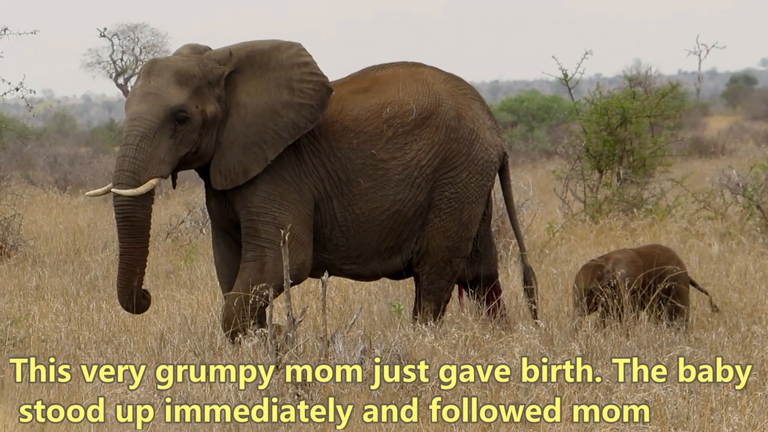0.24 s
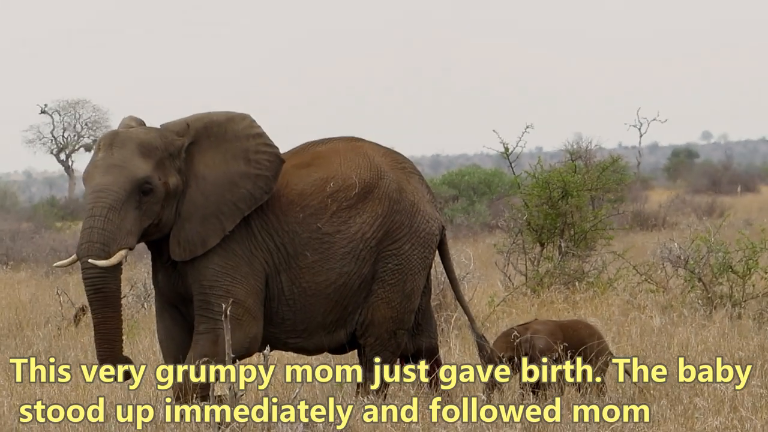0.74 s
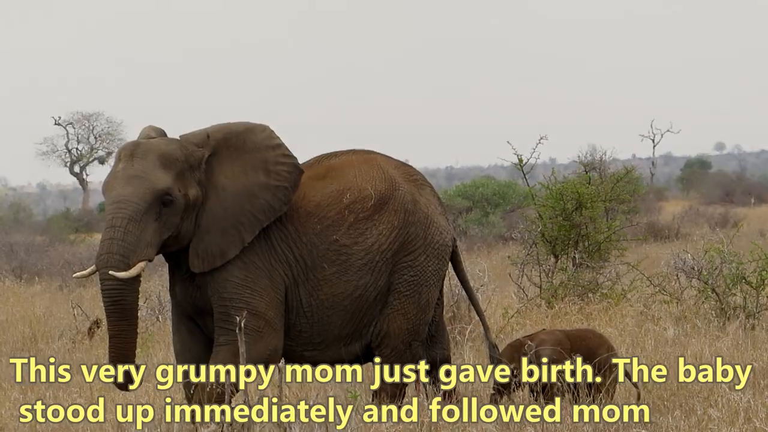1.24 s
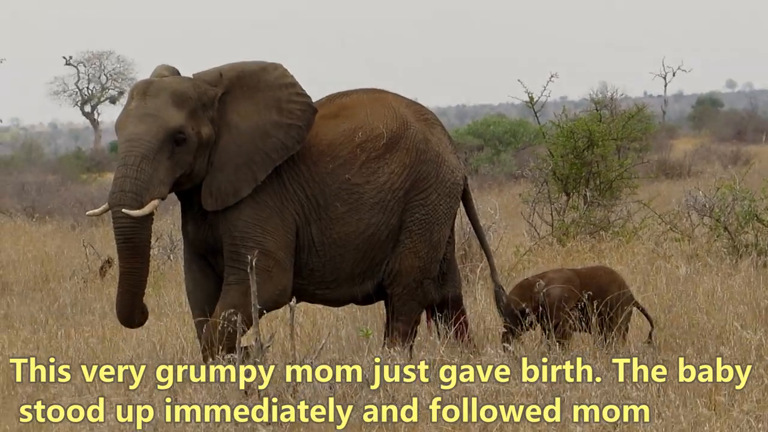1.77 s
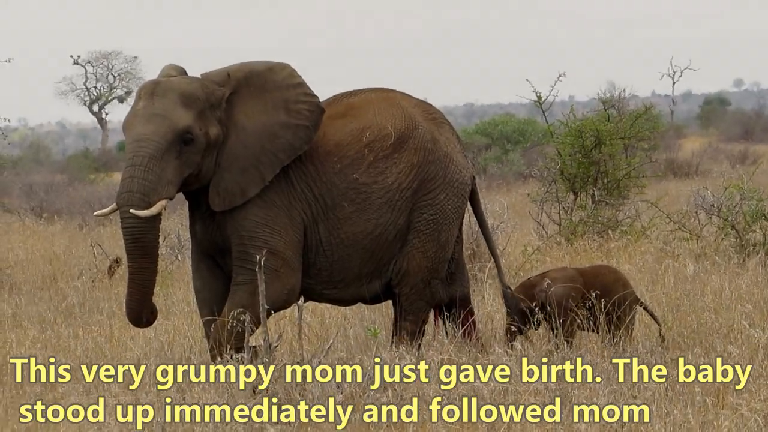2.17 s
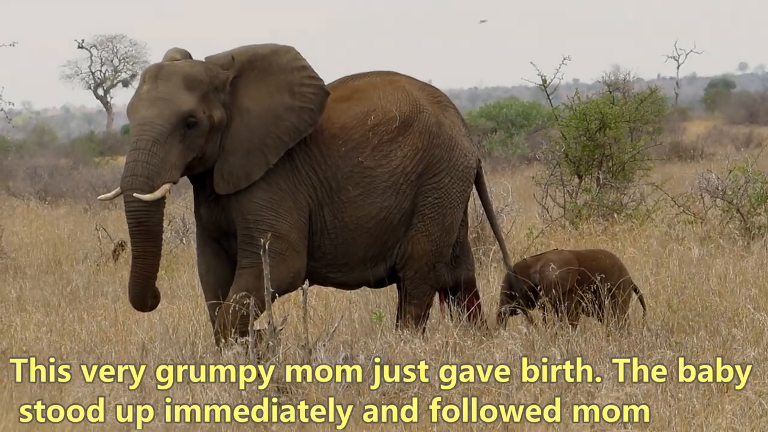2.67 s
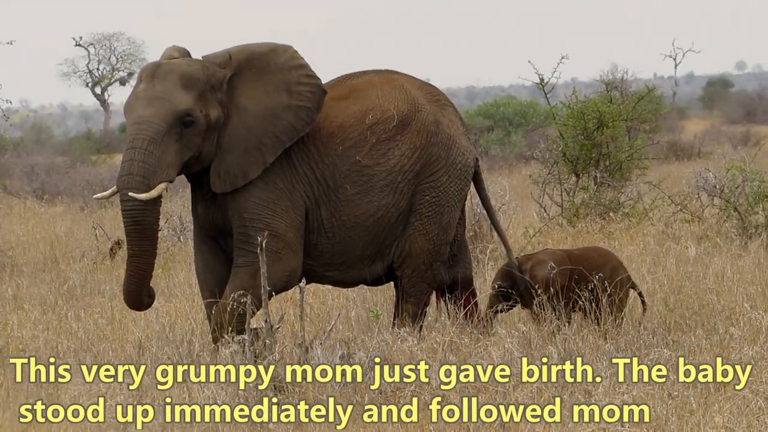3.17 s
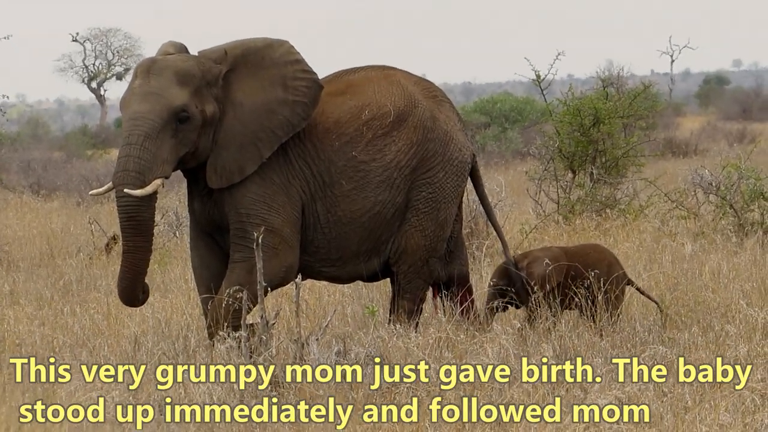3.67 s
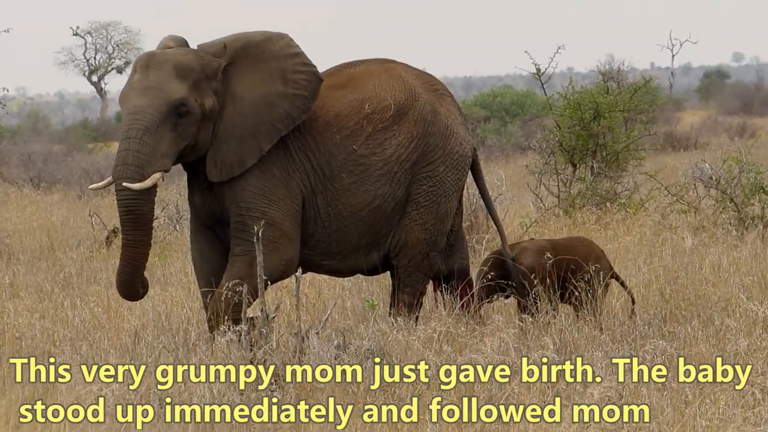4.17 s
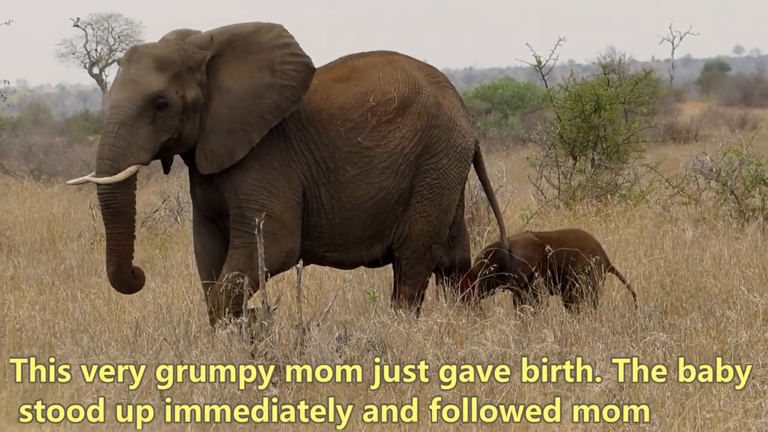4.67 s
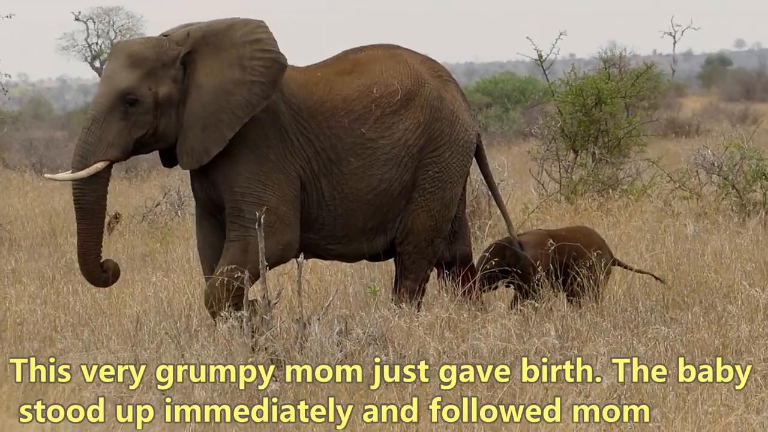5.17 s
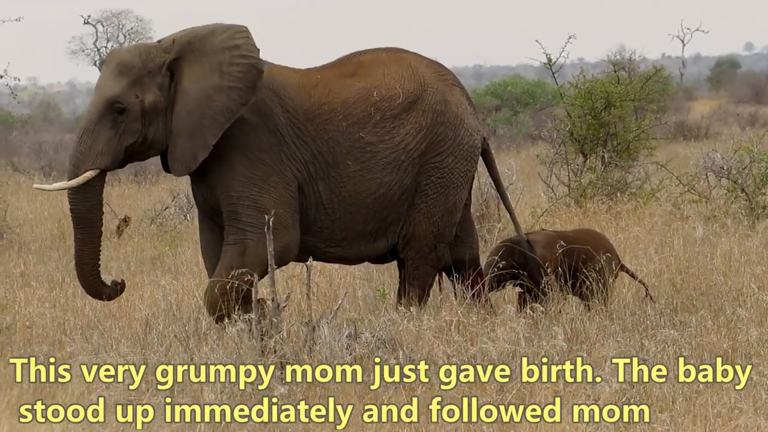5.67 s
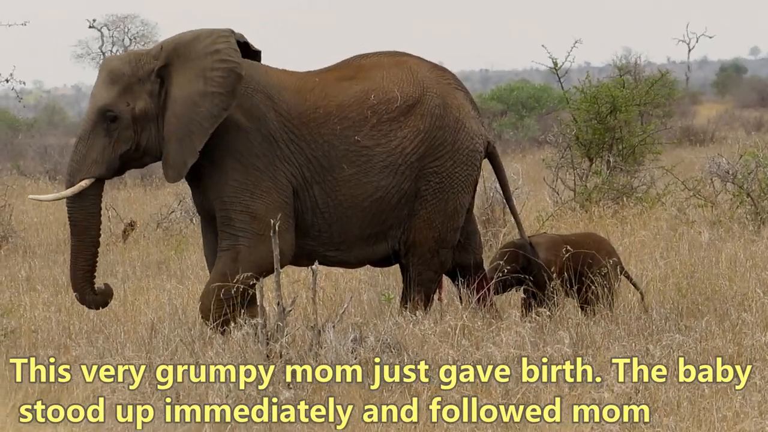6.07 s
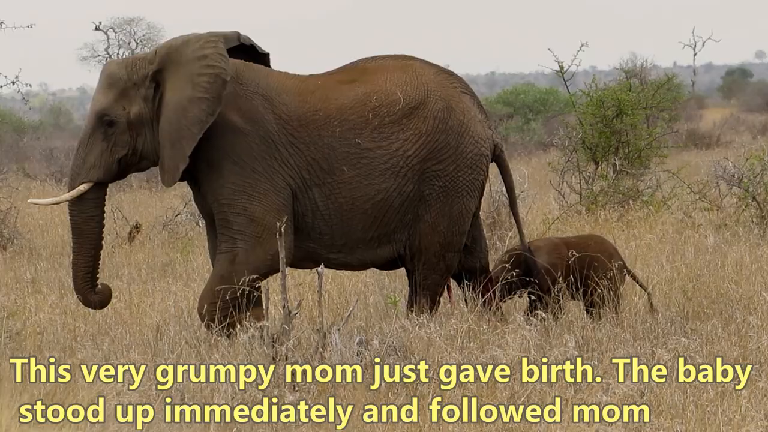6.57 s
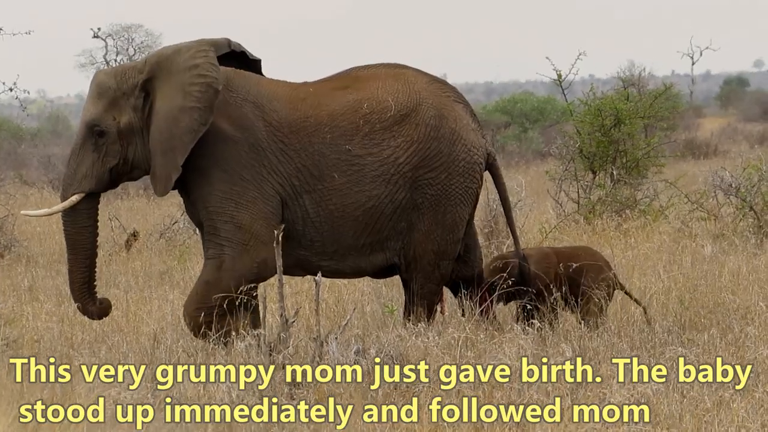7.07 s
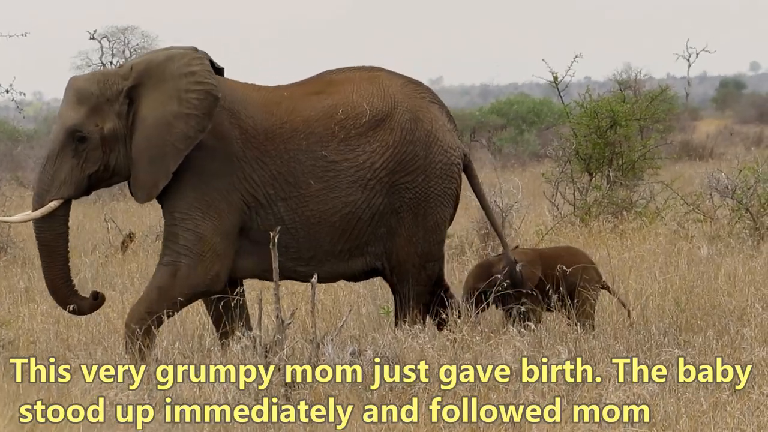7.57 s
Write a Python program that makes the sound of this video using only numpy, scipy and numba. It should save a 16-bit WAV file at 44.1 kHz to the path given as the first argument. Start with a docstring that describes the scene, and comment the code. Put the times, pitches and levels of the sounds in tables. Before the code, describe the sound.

Outdoors in dry grassland, stereo microphone with soft background hiss and faint insects. A large elephant bellows hoarsely from the first instant, crackles apart, and jumps abruptly to a quiet throaty rumble of separate slow pulses. The rumble swells and rises into a fuller, longer roar, rough and strained, collapsing into guttural growls. A hard cut to silence follows, then the quiet background returns with small clicks and light handling-like knocks.

```python
"""An elephant's roar is heard first, already under way; the sound cuts abruptly to a slow rumble,
which climbs into a second, longer roar, and then all sound drops out briefly. Pulses of the
larynx give way to chaotic flow with effort, and both excite resonances of chest, throat and mouth.
Around the voice: shaped-noise hiss, a drone and an insect band of resonant noise, and short
noise bursts for ticks and knocks near the microphone."""
import sys
import numpy as np
from scipy import signal
from scipy.fft import rfft, irfft
from scipy.io import wavfile
from scipy.ndimage import uniform_filter1d
from numba import njit

SR = 44100
rng = np.random.default_rng(int(sys.argv[2]) if len(sys.argv) > 2 else 0)


def dump_mix(stems):
    """Bounce the given channels to the path in sys.argv[1] as a 16-bit WAV at rate SR."""
    frames = np.atleast_2d(stems).T  # one column per channel
    limited = np.clip(frames, -1, 1)  # hard clip at full scale
    pcm = np.round(limited * 32767).astype(np.int16)
    wavfile.write(sys.argv[1], SR, pcm)


N = 345744

# hiss common to both sides, spectral shape: f/Hz, relative level/dB
COMMON_HISS = [(15, -36), (25, -0.5), (59, 0), (240, -4.5), (274, -2), (482, -8), (523, -4.5), (782, -4.5),
               (945, -2.5), (1020, -9), (2850, -14), (3930, -18), (9300, -18.5), (12800, -24), (15500, -35)]
# hiss opposite in the two sides, spectral shape: f/Hz, relative level/dB
OPPOSED_HISS = [(15, -35), (25, -14), (129, -0.5), (322, -4.5), (666, -9.5), (782, -9.5), (970, -11),
                (1660, -20.5), (3440, -25), (3930, -28.5), (7300, -30), (9500, -38.5), (13500, -56.5),
                (15500, -51)]
COMMON_HISS_DB, OPPOSED_HISS_DB = -37, -29
# gain of the whole background: t/s, level/dB
BACKGROUND_SWELL = [(0, -3.5), (.5, -1), (1.87, 2), (7.84, 1.36)]
# drone bands, before the swell: f/Hz, width of each resonance pass/Hz, level/dB
DRONE_BANDS = [(284.4, 50, -79.5), (537.2, 16, -48), (745, 58, -62), (886.6, 27, -50.5), (974, 168, -45.5)]
# insect band, before the swells: f/Hz, width of each resonance pass/Hz, level/dB
INSECT_BAND = (9370, 570, -54)
# the insects swell and ease: t/s, level/dB
INSECT_GAIN = [(0, -2), (1.8, 0), (2.3, 3.5), (2.9, 1), (3.4, 0.5), (7.84, 0)]
# short hissy ticks: t/s, relative level/dB (played 9.5 dB lower), f/Hz, level of the lower part against the
# relative level/dB (played 2 dB lower)
NEAR_TICKS = [(1.5384, -24.5, 13600, -12), (1.5663, -28, 13100, -8), (1.6796, -27, 13600, -9),
              (1.898, -31, 10600, -15), (2.0133, -29, 11580, -18), (2.1084, -28, 12700, -14),
              (2.215, -29, 12200, -17), (2.3161, -29, 12900, -15), (2.3979, -39, 11800, -13),
              (2.4943, -31, 10400, -12), (2.5661, -35, 12100, -13), (2.612, -30, 11300, -13),
              (2.6692, -31, 9810, -13), (2.7694, -36, 11000, -13), (2.8715, -33, 10400, -13),
              (2.9894, -37, 12200, -13), (3.0874, -43, 10900, -13), (3.1967, -35, 11300, -13),
              (3.2915, -37, 12100, -13), (5.2116, -31, 12400, -16), (5.2475, -32, 11210, -13),
              (5.288, -25.5, 10620, -11), (5.7862, -32, 11800, -14), (5.878, -33.5, 11710, -13),
              (6.7376, -31, 13300, -16), (6.8399, -30, 11700, -13), (6.9341, -29, 12400, -20),
              (7.0434, -32, 12300, -13), (7.1584, -33, 12100, -15), (7.8184, -28, 13100, -15)]
# small chance ticks, before a random offset: t/s, relative level/dB
CHANCE_TICKS = [(0, -52), (1.4, -50), (1.9, -45), (3.3, -45.5), (4, -52), (5.8, -46), (7.84, -49)]
# knocks with a ring: t/s, relative ring level/dB, f/Hz, 60 dB decay time/s, crack level/dB
NEAR_KNOCKS = [(2.385, -37, 2950, .04, -55), (5.654, -18.5, 2890, 0.045, -27),
               (6.274, -26.5, 3300, 0.045, -34), (6.7, -33.5, 2800, 0.039, -50),
               (6.806, -35, 2870, 0.03, -50), (6.86, -38, 1900, .04, -40), (6.932, -25, 333, 0.083, -36)]

# larynx pulse rate in the rumble: t/s, f/Hz
PULSE_RATE = [(2.35, 23.8), (2.642, 23.67), (2.726, 24.1), (2.906, 24.25), (3.058, 24.73), (3.166, 24.4),
              (3.288, 25.23), (3.406, 25.52), (3.57, 29.01), (3.72, 29.97)]
# voicing: t/s, chaotic share (0-1), share locked to the first resonance (0-1)
VOICING_SHARES = [(0, .8, .45), (1.2, .85, .5), (1.45, .7, .3), (1.7, .2, .65), (1.87, .1, .8),
                  (1.9, .05, 0), (2.4, .006, 0), (3.15, .008, 0), (3.5, .05, 0), (3.62, .18, 0),
                  (3.72, .3, .15), (3.8, .45, .5), (3.85, .5, .9), (3.93, .5, .9), (3.97, .6, .3),
                  (4.12, .6, .3), (4.17, .9, .9), (4.85, .9, .85), (4.95, .9, .5), (5.6, .85, .4),
                  (6.15, .8, .35), (6.22, .3, .6)]
# effort in five stages (first roar, its break-up, rumble, second roar, its break-up), each listing
# t/s, then relative level/dB of first resonance, open mouth, treble, chest, low rasp
CALL_STAGES = [
    [(0.0, -23.5, -26, -33, -52, -44.5), (0.03, -28, -32, -34.5, -61, -66),
     (0.09, -23, -28.5, -33, -60, -58), (0.27, -23.5, -28, -38, -62, -59),
     (0.362, -18.5, -26, -35.5, -51, -56), (0.434, -23, -25.5, -32.5, -67, -54),
     (0.542, -17.5, -22.5, -33, -38, -47), (0.668, -21, -26, -30.5, -64.5, -56),
     (0.772, -18, -21, -31, -38.5, -37.5), (1.232, -17.5, -20.5, -30.5, -40.5, -28),
     (1.25, -14, -17.5, -30, -41, -41)],
    [(1.28, -18, -21.5, -36, -41, -30.5), (1.328, -19.5, -21.5, -31, -40.5, -38),
     (1.426, -23, -19.5, -38, -35, -25), (1.454, -24.5, -32.5, -56, -30, -29),
     (1.546, -21, -28, -43, -38.5, -35), (1.606, -33, -38, -55, -34.5, -34),
     (1.644, -25, -42, -54, -39, -41), (1.704, -30, -47, -55, -31, -41), (1.738, -26, -48, -48, -39, -35),
     (1.812, -25, -56, -50, -28, -40), (1.874, -22.5, -41, -36, -28.5, -33)],
    [(1.89, -48, -51.5, -45, -44, -38), (1.936, -51, -58, -55, -48, -60), (2.19, -39, -56, -52, -38, -42),
     (2.28, -42, -49, -54, -43, -46), (2.328, -47, -56, -49, -39.5, -43),
     (2.504, -29, -40.5, -50, -31.5, -31.5), (2.69, -23.5, -47.5, -46, -32, -27),
     (2.742, -23, -35.5, -45, -30, -22), (2.936, -24.5, -39, -37, -32, -28),
     (3.066, -21.5, -40, -51, -30, -29.5), (3.18, -24.5, -36, -52, -28.5, -30),
     (3.26, -21, -37, -51, -31, -31), (3.44, -20.5, -36, -47, -31, -34),
     (3.6, -22.5, -40.5, -42, -27.5, -35)],
    [(3.63, -24.5, -43, -51, -31, -40.5), (3.74, -21, -37, -48, -31.5, -39),
     (3.79, -17.5, -26, -49, -33.5, -27), (3.858, -13, -26, -39, -42.5, -21.5),
     (4.048, -18, -26.5, -29.5, -46.5, -54), (4.086, -13, -23.5, -36, -51, -48),
     (4.242, -9.5, -27, -32.5, -42.5, -55), (4.33, -13.5, -23.5, -31.5, -46, -52),
     (4.454, -15, -26.5, -31.5, -48.5, -49), (4.53, -7.5, -25, -29.5, -47, -52),
     (4.6, -9, -25.5, -30.5, -45.5, -54), (4.66, -13, -21.5, -29.5, -46, -56.5),
     (4.77, -11, -22.5, -29, -43.5, -58), (4.85, -10, -22.5, -28.5, -42, -62),
     (4.89, -15, -20.5, -27, -42, -54), (5.02, -11, -24.5, -24.5, -44.5, -49),
     (5.308, -15, -23, -25.5, -43.5, -50), (5.546, -13, -21.5, -22.5, -44.5, -41),
     (5.58, -16.5, -19.5, -26, -47, -54)],
    [(5.61, -13, -20, -22.5, -44, -41.5), (5.634, -14, -17, -25.5, -40.5, -25),
     (5.668, -11, -22.5, -27.5, -33, -33.5), (5.742, -13.5, -18, -35, -36, -26),
     (6.012, -16.5, -26, -52, -34, -28), (6.062, -19, -26.5, -45, -39, -33),
     (6.158, -22.5, -29.5, -51, -28, -26), (6.196, -28.5, -40.5, -51, -34, -35),
     (6.266, -21.5, -42.5, -54, -30.5, -34.5), (6.274, -17, -37.5, -43, -31, -36.5),
     (6.34, -28.5, -43.5, -48.5, -27.5, -32.5)],
]
# brief changes of voice level, mostly dips: t/s, length/s, change/dB
VOICE_CATCHES = [(.245, .04, -3), (.7, 0.041, -3.5), (0.837, .05, -4), (.99, 0.026, -3.5),
                 (1.291, 0.025, -5), (1.385, 0.032, -7.5), (1.445, 0.028, -7), (1.519, 0.022, -9),
                 (1.705, .04, -5.5), (3.942, 0.04, -3), (4.02, 0.026, -4.5), (4.056, .03, -4.5),
                 (4.09, .02, -6.5), (4.361, .08, -2), (4.475, 0.035, 0), (4.519, 0.017, 0.5),
                 (4.647, 0.045, -3.5), (4.75, .03, -4.5), (4.91, .06, -3.5), (5.44, 0.028, -2),
                 (5.818, .02, -3.5), (6.004, 0.03, -6.5), (6.102, 0.029, -9), (6.139, 0.03, -9)]
# first throat resonance, climbing as the mouth opens: t/s, f/Hz
FIRST_RESONANCE = [(0, 261.2), (.1, 282), (.5, 265.8), (1.04, 293.7), (1.36, 286.5), (1.6, 256.2),
                   (1.74, 215.8), (1.87, 188), (2.2, 174), (2.62, 140.3), (2.85, 151), (3.0, 171),
                   (3.18, 177), (3.32, 193.5), (3.46, 199.6), (3.62, 215.4), (3.76, 262.4), (3.84, 272),
                   (3.9, 296), (3.94, 334.6), (3.96, 275), (4.1, 295.5), (4.14, 272), (4.2, 289.1),
                   (4.34, 284.8), (4.38, 305), (4.42, 281.7), (4.5, 299.2), (4.6, 315), (4.63, 283),
                   (4.84, 304), (4.9, 280), (5.02, 298.3), (5.1, 305), (5.2, 299.3), (5.3, 305),
                   (5.38, 317.6), (5.52, 301.9), (5.58, 271.6), (5.86, 264.7), (6.0, 245), (6.15, 255.1),
                   (6.27, 196.2)]
# higher resonances: width of each pass/Hz, share that follows the treble (0-1), then for each pose
# (first roar x3, rumble, second roar x3) a pair f/Hz, level against the open mouth/dB
UPPER_RESONANCES = [(110.7, 0.059, (520, -.5), (520, -2.5), (545, -2), (418, -1), (540, 0), (520, 1),
                    (475, 1.71)), (120.5, 0.0371, (700, -6.5), (750, -1.2), (840, 0.36), (320, -2.9),
                    (620, -6.5), (630, -10), (645, -4.5)), (129.2, 0.47, (880, -10.5), (920, -4),
                    (960, -9.5), (910, -12), (910, -2.5), (835, -10.5), (900, -9.5)), (90, 1, (1110, -6.5),
                    (1100, -1.3), (1170, -15), (1150, -9.5), (1195, -3), (1215, -3), (1200, -2.5)),
                    (100.5, 0.93, (1400, -15), (1400, -9.5), (1470, -4.5), (1370, -23), (1470, -3.5),
                    (1425, -2.7), (1435, -8.5)), (120.9, 0.99, (1560, -2), (1620, -8.5), (1690, -1.8),
                    (1600, -27), (1605, -9.5), (1620, -9), (1670, -10.5)), (99.2, 0.91, (1700, -9),
                    (1800, -11.5), (1910, -9), (1850, -21), (1700, -15), (1880, -12.5), (1865, -17)),
                    (130, 0.81, (2400, -17), (2350, -13.5), (2310, -10.5), (1800, -31), (2100, -31),
                    (2250, -33), (2300, -31)), (212.5, 0.61, (2700, -12), (2640, -10.5), (2620, -18.5),
                    (2590, -31), (2600, -16.5), (2700, -22), (2840, -18)), (390, 0.92, (3120, -19),
                    (3050, -20.5), (2950, -26.5), (3500, -25), (3230, -15.5), (3300, -21), (3000, -27))]
# times of the mouth poses; the rumble pose is held over two of them: t/s
POSE_TIMES = (0.1, .7, 1.2, 2.5, 3.5, 4.2, 4.9, 5.6)
# period doubling, every second swing weaker: t/s, length/s, level against first resonance/dB
PERIOD_DOUBLING = [(3.893, .14, -7), (5.72, .1, -14.5)]
# single strong growl pulses at the rough starts, middles and ends of the roars: t/s, relative level/dB
GROWL_PULSES = [(0.079, -9), (0.103, -11), (0.153, -11.5), (0.181, -10), (0.22, -12), (0.37, -12),
                (1.29, -15), (1.34, -13), (1.39, -12), (1.409, -16), (1.519, -7.5), (1.549, -10),
                (1.647, -9), (1.718, -17), (1.786, -17), (1.828, -20), (1.862, -20), (3.716, -13.5),
                (3.849, -5), (3.974, -2.5), (4.024, -6), (4.064, -5), (4.092, -8), (5.2, -4.5), (5.532, -6),
                (5.556, -8), (5.649, -3.5), (5.698, -3), (5.741, -2.5), (5.789, 0.5), (5.923, -3),
                (6.021, -6.5), (6.102, -5), (6.139, -10), (6.243, -14), (6.271, -11.5)]
# a narrow resonance flares for a moment: t/s, length/s, starting f/Hz, final f/Hz, level/dB
RESONANCE_FLARES = [(0.327, 0.28, 1720, 1800, -36.5), (.35, 0.4, 3100, 3050, -44), (.45, .2, 940, 990, -37),
                    (0.85, 0.27, 1090, 1253, -28.5), (0.954, 0.099, 790, 830, -21.5),
                    (1.15, .2, 833, 850, -30), (1.229, 0.086, 2674, 2700, -34),
                    (1.413, 0.049, 2600, 2620, -42), (5.28, .16, 267, 255, -18.5),
                    (3.25, .12, 215, 240, -30), (4.1, .1, 288, 270, -28), (3.35, .16, 457, 444, -37.5),
                    (3.05, .2, 315, 325, -38.5), (4.4, 0.073, 680, 660, -30.5),
                    (4.55, .12, 620, 740, -26.5), (5.3, 0.27, 400, 410, -26), (3.35, 0.17, 255, 260, -32.5),
                    (3.79, .06, 560, 580, -28), (4.93, .1, 473, 460, -24.5), (4.55, .3, 1190, 1090, -37),
                    (4.55, 0.14, 518, 550, -33), (4.3, .2, 1881, 1895, -42.5), (4.748, .2, 637, 594, -31),
                    (4.269, 0.15, 602, 500, -24), (4.799, .12, 1500, 1456, -33),
                    (4.995, .025, 2604, 2630, -34.5), (5.04, 0.027, 2570, 2560, -34),
                    (5.204, 0.35, 510, 473, -20.5), (5.244, 0.13, 1210, 1180, -28.5),
                    (5.355, 0.036, 2850, 2850, -32.5), (5.42, 0.037, 2848, 2860, -35),
                    (5.38, .18, 1590, 1670, -31), (5.47, 0.11, 930, 900, -28.5),
                    (5.597, 0.11, 1218, 1255, -25)]
# the animal stands to the left: f/Hz, left minus right level/dB, left lead/rad
BEARING_CUES = [(56.6, -0.5, 0.62), (199, 3, 0.11), (414, 5, 0.97), (734, 8.5, 0.42), (1300, 7, 0.72),
                (2070, 4.5, 1.74), (3500, 4.5, 0.26)]
# echoes off ground and scrub: left delay/s, right delay/s, level/dB
SCRUB_ECHOES = [(0.012, 0.018, -11.5), (0.039, 0.027, -12.5), (0.07, 0.07, -33.5)]
# dropout of all sound; the voice is absent after it: start t/s, end t/s
DROPOUT = (6.3435, 6.5432)

PULSE_ANCHOR_S = 2.421  # one pulse falls exactly here
JITTER_PER_CHAOS, JITTER_LIMIT = 0.45, 0.33
SPLICE_S = 1.876  # the voice levels jump from the first call to the second
CATCH_SNAP = 0.16  # the voice returns in this share of the time it took to fade
SURGE_DB, SURGE_CORNER_HZ = 1.6, 7  # unsteady breath, in proportion to chaos
ROAR_WIDTH_HZ, RUMBLE_WIDTH_HZ = 78, 29.5  # the closed mouth rings longer
SKIRT_RATIO, SKIRT_DB = 1.314, -11.5  # a broad second ring just above the first in the rumble
CHEST_LAG_S = 0.01423  # the push peaks with the ring of the throat
PUFF_DB = -24  # air through the mouth, against the flap
FLARE_Q, FLARE_EXTRA_HZ = 21, 12  # width is starting frequency / Q plus the extra
STOPBAND_HZ = 15900


def from_db(db):
    """Decibel definition: amplitude ratio from level."""
    return 10 ** (np.asarray(db) / 20)


def seconds():
    """Uniform sampling: the time of every sample."""
    return np.arange(N) / SR


def noise():
    """White noise: equal mean power at every frequency."""
    return rng.standard_normal(N)


def rms_one(x):
    """Normalisation of power: the signal scaled to rms 1."""
    return x / np.sqrt(np.mean(x ** 2) + 1e-20)


def in_time(rows):
    """Linear interpolation in time: columns of a table at every sample."""
    s, *columns = np.transpose(rows)
    return [np.interp(seconds(), s, c) for c in columns]


def in_pitch(points):
    """Interpolation over log frequency: columns of a table at every FFT bin."""
    hz, *columns = np.transpose(points)
    log_bins = np.log(np.fft.rfftfreq(N, 1 / SR) + 1)
    return [np.interp(log_bins, np.log(hz), c) for c in columns]


def drift(corner_hz):
    """Low-passed noise: slow random variation with rms 1."""
    r = np.exp(-80 * np.pi * corner_hz / SR)  # computed at every 40th sample
    raw = rng.standard_normal(N // 40 + 2002)
    slow = signal.lfilter([1], [1, -2 * r, r * r], raw)[2000:]
    return np.interp(np.arange(N) / 40, np.arange(len(slow)), rms_one(slow))


@njit
def moving(x, w, r):
    """Two-pole resonance whose centre w moves, with a gain near 1 at its peak."""
    y = np.zeros(len(x))
    for i in range(2, len(x)):
        drive = (1 - r * r) / 2 * (x[i] - x[i - 2])
        y[i] = drive + 2 * r * np.cos(w[i]) * y[i - 1] - r * r * y[i - 2]
    return y


def resonate(x, hz, width_hz):
    """Cascaded resonance: two passes deepen the valleys; white noise of rms 1 stays near rms 1."""
    w = 2 * np.pi * hz / SR * np.ones(N)
    r = np.exp(-np.pi * width_hz / SR)
    return moving(moving(x, w, r), w, r) * np.sqrt(2 * SR / (np.pi * width_hz))


def evened(x, span_s):
    """Held effort: power is levelled over the span while variation within it remains."""
    return x / np.sqrt(uniform_filter1d(x ** 2, int(span_s * SR)) + 1e-6)


def bursts(times, db, rise_s, fall_s):
    """Transient envelopes: exponential rise and decay after each onset."""
    marks = np.full(N, 1e-18)
    marks[(np.array(times) * SR).astype(int)] = from_db(db)
    t = np.arange(int(.08 * SR)) / SR
    shape = (1 - np.exp(-t / rise_s)) * np.exp(-t / fall_s)
    return signal.fftconvolve(marks, shape / shape.max())[:N]


def hiss(spectrum):
    """Spectral shaping: white noise weighted by a level curve over frequency, rms 1."""
    return rms_one(irfft(rfft(noise()) * from_db(in_pitch(spectrum)[0]), N))


def drone():
    """Narrow-band noise: resonances whose levels wander slowly."""
    return sum(from_db(db + 2.0 * drift(0.51)) * resonate(noise(), hz, width_hz)
               for hz, width_hz, db in DRONE_BANDS)


def insects():
    """Band-limited noise: one high resonance with a quick flutter in level."""
    hz, width_hz, db = INSECT_BAND
    level_db = db + in_time(INSECT_GAIN)[0] + 1.7 * drift(21.0)
    return from_db(level_db) * resonate(noise(), hz, width_hz)


def background():
    """Stereo correlation: common sound is central, opposed hiss widens it."""
    common = from_db(COMMON_HISS_DB + 0.76 * drift(27)) * hiss(COMMON_HISS) + drone() + insects()
    opposed = from_db(OPPOSED_HISS_DB + .6 * drift(5)) * hiss(OPPOSED_HISS)
    return from_db(in_time(BACKGROUND_SWELL)[0]) * (common + opposed * [[1], [-1]])


def ticks():
    """Noise transients: bright puffs with a part an octave down, and smaller ones by chance."""
    s, db, centre_hz, low_db = np.transpose(NEAR_TICKS)
    hz = np.clip(np.interp(seconds(), s, centre_hz), 1000, 15000)
    chance = rng.random((420, 2))
    small_s = chance[:, 0] * (N - 1) / SR
    small_db = np.interp(small_s, *np.transpose(CHANCE_TICKS)) + 2 - 14 * chance[:, 1]
    small = bursts(small_s, small_db, 0.001, 0.006)
    large = bursts(s, db - 9.5, 0.003, 0.012)
    common, opposed = [resonate(noise(), hz, 2800) * large + resonate(noise(), 12550, 5000) * small
                       for _ in range(2)]
    low = resonate(noise(), hz / 2, 2500) * bursts(s, db + low_db - 2.0, 0.0012, 0.0093)
    return common + low + 0.62 * opposed * [[1], [-1]]


def knocks():
    """Damped resonance: a short noisy ring joined by a broadband crack."""
    out = np.zeros(N)
    for s, db, hz, t60, crack_db in NEAR_KNOCKS:
        ring_shape = bursts([s], db - 3.5, 0.0028, t60 / np.log(1000))
        out += ring_shape * resonate(noise(), hz, 0.24 * hz)
        out += bursts([s], crack_db, 0.0013, 0.011) * noise()
    return out


def flares(flow):
    """Selective resonance: breath sings briefly in one narrow, gliding band."""
    out = np.zeros(N)
    for s, length_s, from_hz, to_hz, db in RESONANCE_FLARES:
        along = (seconds() - s) / (length_s / 2)
        hz = np.interp(along, [-1, 1], [from_hz, to_hz])
        ring = resonate(flow, hz, from_hz / FLARE_Q + FLARE_EXTRA_HZ)
        out += from_db(db) * np.exp(-along ** 2) * evened(ring, 0.046)
    return out


def growls(swing):
    """Impulsive excitation: each flap swings the first resonance and puffs air through the mouth."""
    s, db = np.transpose(GROWL_PULSES)
    ring = bursts(s, db - 4, 0.0027, 0.0049) * np.sin(swing)
    ring = signal.sosfilt(signal.butter(2, 140, "high", fs=SR, output="sos"), ring)
    return ring + bursts(s, db + PUFF_DB, .001, .008) * resonate(noise(), 540, 840)


def effort():
    """Source level: five level curves jump between the calls, and catches dent them all."""
    t = seconds()
    dent_db = np.zeros(N)
    for s, length_s, db in VOICE_CATCHES:
        span_s = length_s * np.where(t > s, CATCH_SNAP, 1)
        dent_db += db * np.exp(-(2 * (t - s) / span_s) ** 2)
    first_call = in_time(np.vstack(CALL_STAGES[:2]))
    second_call = in_time(np.vstack(CALL_STAGES[2:]))
    return np.where(t < SPLICE_S, first_call, second_call) + dent_db


def larynx():
    """Fold vibration: jittered pulses mixed with chaotic flow; returns mix, both shares and flow."""
    chaos, locked = in_time(VOICING_SHARES)
    jitter = np.minimum(JITTER_PER_CHAOS * chaos, JITTER_LIMIT)
    rate, = in_time(PULSE_RATE)
    cycles = np.cumsum(rate * from_db(9 * jitter * drift(14))) / SR
    cycles -= cycles[int(PULSE_ANCHOR_S * SR)]
    closes = np.diff(np.floor(cycles), prepend=np.floor(cycles[0])) > 0
    pulses = closes * np.sqrt(SR / rate) * from_db(9.3 * jitter * drift(35))
    puff = 1.55 + 0.5 * np.exp(-3.0 * (cycles % 1))  # turbulence is strongest just after each closure
    flow = rms_one(puff * noise())
    return np.sqrt(1 - chaos) * pulses + np.sqrt(chaos) * flow, chaos, locked, flow


def first_resonance(source, hz, closed, locked, swing, sway):
    """Source-filter coupling: a driven throat resonance joined by a swing locked to it."""
    rumble = evened(resonate(source, hz, RUMBLE_WIDTH_HZ), 0.14)
    roar = evened(resonate(source, hz, ROAR_WIDTH_HZ), 0.12)
    driven = closed * rumble + (1 - closed) * roar
    first = np.sqrt(1 - locked) * driven + np.sqrt(2 * locked) * sway * np.sin(swing)
    return closed * first + (1 - closed) * evened(first, 0.038)


def chest(source):
    """Low-frequency resonance: a band filter run backwards in time, so its ring leads the pulse."""
    # the folds open slowly and snap shut: lows come first
    band = signal.butter(3, [28, 115], "band", fs=SR, output="sos")
    lagged = np.roll(source, int(CHEST_LAG_S * SR))
    return evened(signal.sosfilt(band, lagged[::-1])[::-1], .13)


def upper_resonances(airy, locked, open_db, treble_db):
    """Vocal tract modes: noise rings and sung strands glide with the mouth poses."""
    out = np.zeros(N)
    for width_hz, share, *poses in UPPER_RESONANCES:
        held_poses = np.transpose(poses[:4] + poses[3:])
        hz, db = [np.interp(seconds(), POSE_TIMES, c) for c in held_poses]
        db = open_db + db + share * (treble_db - open_db)
        # centres and strengths vary at random
        ring = resonate(airy, hz * (1 + 0.028 * drift(4.0)), width_hz)
        # a locked voice also sings on each resonance
        strand = np.sin(np.cumsum(2 * np.pi * (hz + .17 * width_hz * drift(9)) / SR))
        sung = evened(evened(ring, 0.029) + 1.37 * locked * strand, 0.088)
        out += from_db(db + 1.27 * drift(8.6)) * sung
    return out


def period_doubling(swing, first_db):
    """Subharmonics: components at 1/2 and 3/2 of the swing frequency."""
    out = np.zeros(N)
    halves = 0.62 * np.sin(swing / 2) + .7 * np.sin(3 * swing / 2)
    for s, length_s, db in PERIOD_DOUBLING:
        out += from_db(first_db + db) * np.exp(-(2 * (seconds() - s) / length_s) ** 4) * halves
    return out


def voice():
    """Source-filter principle: larynx sound shaped by chest, throat and mouth resonances."""
    hz1, = in_time(FIRST_RESONANCE)
    first_db, open_db, treble_db, chest_db, rasp_db = effort()
    source, chaos, locked, flow = larynx()
    first_db = first_db + SURGE_DB * chaos * drift(SURGE_CORNER_HZ)
    # folds pulled along by the first resonance, more steadily when locked
    wander = 0.0911 * (1.15 - locked) * drift(30.23)
    swing = np.cumsum(2 * np.pi * hz1 * (1 + wander) / SR)
    sway = from_db(2.76 * drift(35))
    closed = np.clip(1 - chaos / 0.46, 0, 1)  # near 1 in the rumble, 0 in strong chaos
    out = from_db(first_db) * first_resonance(source, hz1, closed, locked, swing, sway)
    out += from_db(chest_db) * chest(source)
    out += (1 - closed) * from_db(rasp_db) * evened(resonate(source, 0.67 * hz1, 60), 0.037)
    skirt = evened(resonate(source, SKIRT_RATIO * hz1, 70), 0.17)
    out += closed * from_db(first_db + SKIRT_DB) * skirt
    chopped_flow = flow * (1.75 + 1.6 * locked * (1 + np.cos(swing)))  # by the locked swing
    airy = (0.21 + closed) * source + (1 - 0.84 * closed) * chopped_flow
    out += upper_resonances(airy, locked, open_db, treble_db)
    lip_rasp = evened(resonate(airy, 2370, 1400), .13)
    out += (1 - closed) * from_db(treble_db - 19.5) * lip_rasp
    out += from_db(open_db - 1.0) * locked * sway * np.sin(2 * swing + 3.27)  # second harmonic
    out += period_doubling(swing, first_db) + growls(swing) + flares(flow)
    return out * (np.arange(N) < DROPOUT[1] * SR)


def outdoors(x):
    """Binaural cues and reflection: level and phase differences, then echoes unlike in each side."""
    balance_db, lead = in_pitch(BEARING_CUES)
    half = from_db(balance_db / 2) * np.exp(.5j * lead)
    out = irfft(rfft(x) * np.array([half, 1 / half]), N)
    scattered = signal.lfilter(*signal.butter(1, 450, "high", fs=SR), x)  # scrub scatters the lows little
    for left_s, right_s, db in SCRUB_ECHOES:
        for side, s in enumerate((left_s, right_s)):
            delay = int(s * SR)
            out[side, delay:] += from_db(db) * scattered[:N - delay]
    return out


def scene():
    """Superposition: animal, surroundings and small near sounds add linearly."""
    return outdoors(voice()) + background() + ticks() + knocks()


def record(dry):
    """Saturation and band limiting: peaks rounded, a dropout of all sound, the top cut."""
    t = seconds()
    outside_s = np.maximum(DROPOUT[0] - t, t - DROPOUT[1])
    on = np.clip(outside_s / .0005, 0, 1)  # edges of 0.5 ms
    top_cut = signal.cheby2(12, 70, STOPBAND_HZ, fs=SR, output="sos")
    return signal.sosfilt(top_cut, on * 1.123 * np.tanh(dry / 1.16))


dry = scene()
out = record(dry)
dump_mix(out)
```